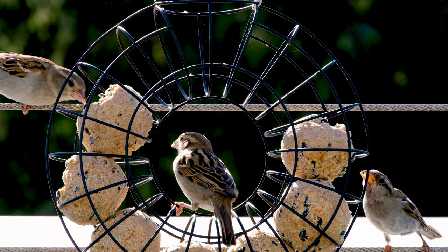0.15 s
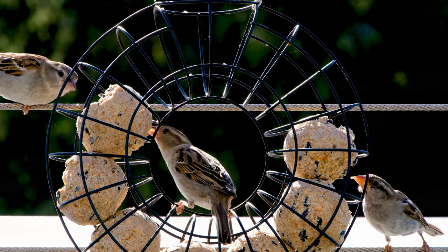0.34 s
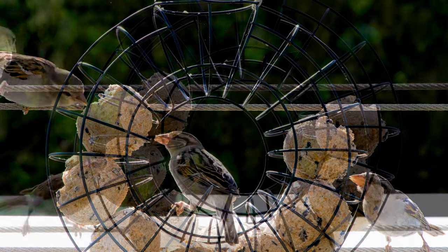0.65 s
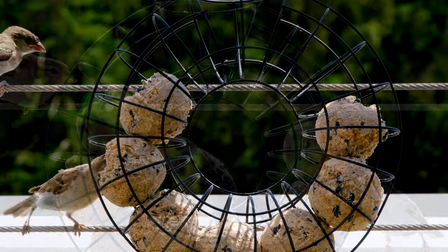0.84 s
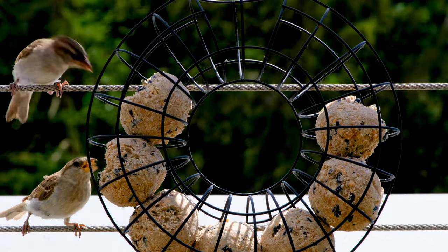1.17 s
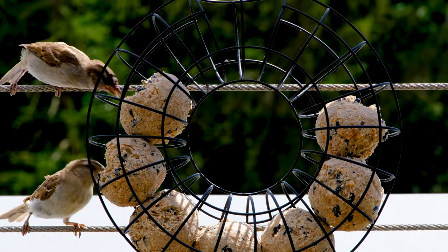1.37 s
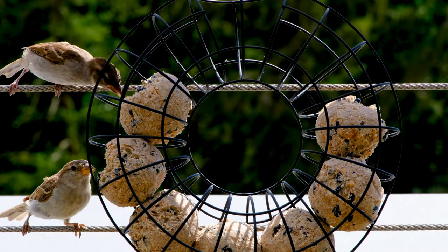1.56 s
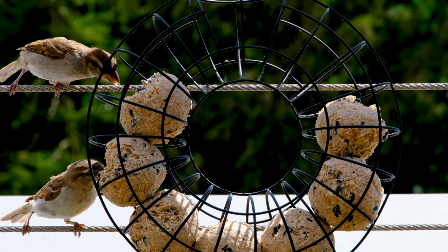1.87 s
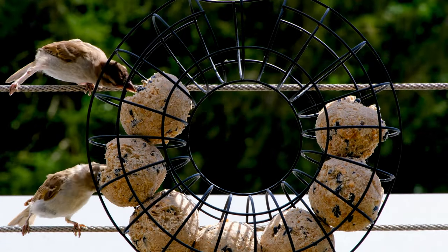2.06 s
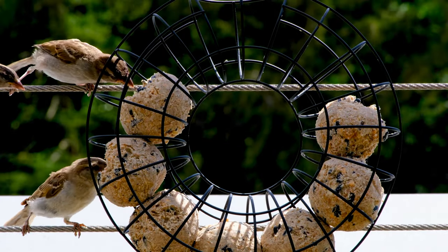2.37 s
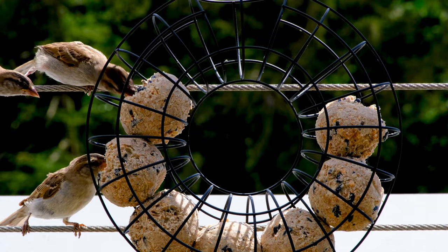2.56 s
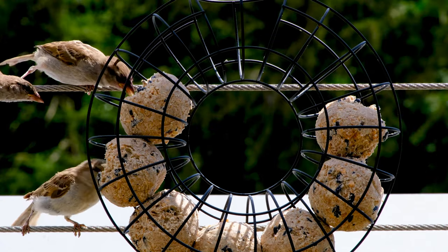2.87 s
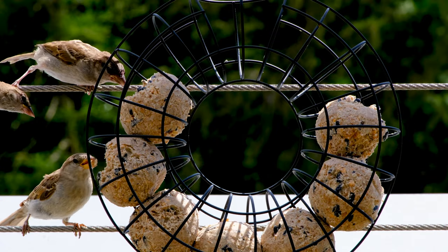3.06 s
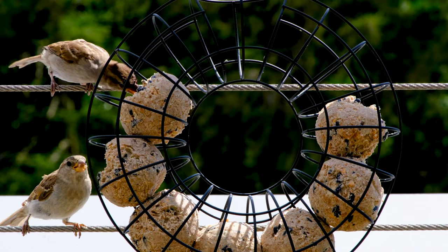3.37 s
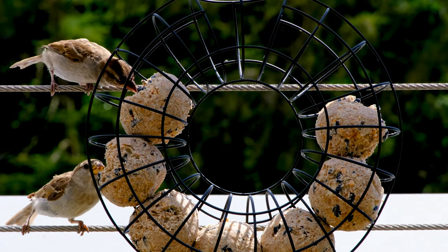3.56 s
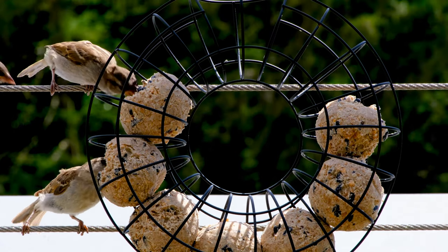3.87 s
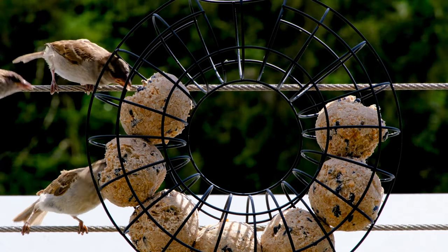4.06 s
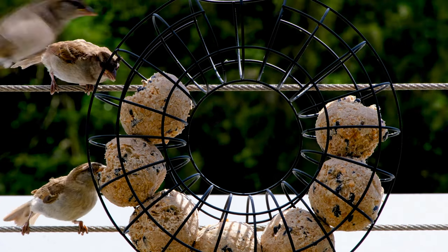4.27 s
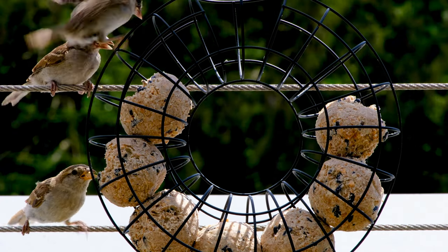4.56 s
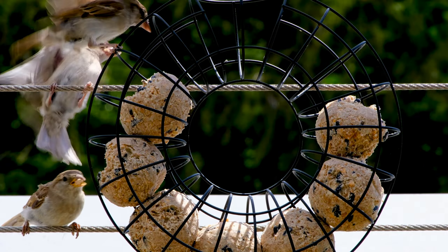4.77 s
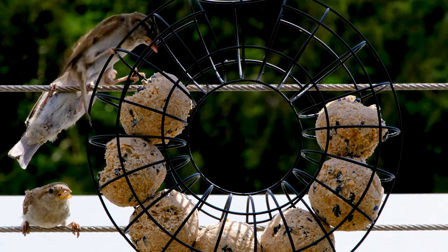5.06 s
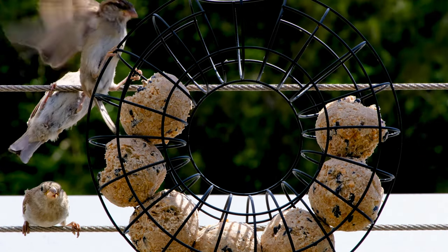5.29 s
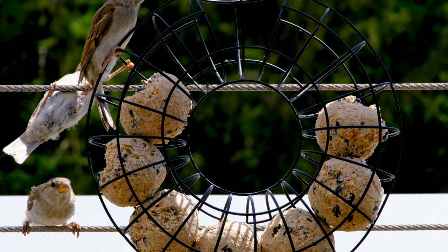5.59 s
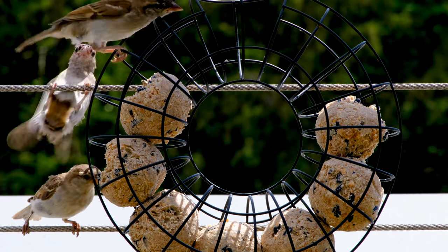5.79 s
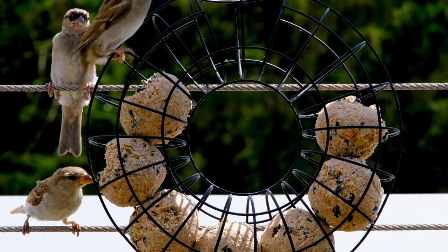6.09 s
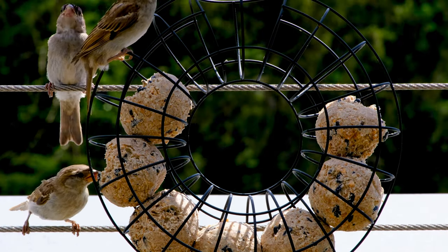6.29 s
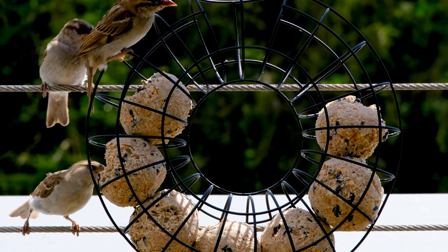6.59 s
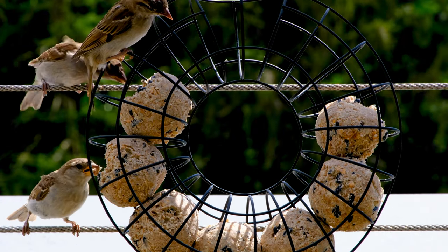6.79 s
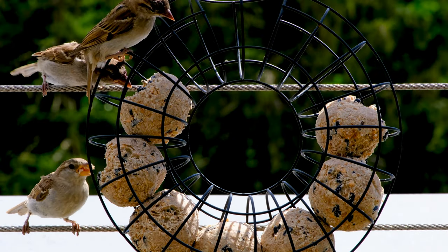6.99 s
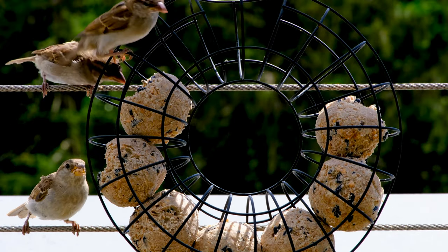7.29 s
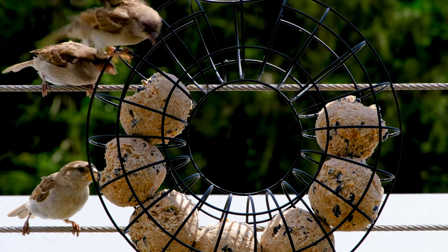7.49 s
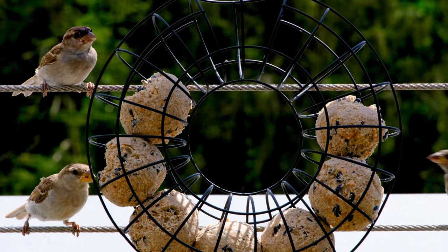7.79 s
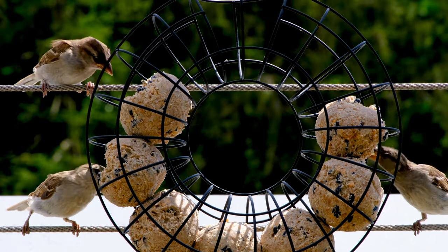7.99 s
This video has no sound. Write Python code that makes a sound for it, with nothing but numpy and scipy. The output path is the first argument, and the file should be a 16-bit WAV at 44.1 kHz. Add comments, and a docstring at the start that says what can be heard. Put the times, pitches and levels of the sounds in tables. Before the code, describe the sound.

Outdoors in a walled garden, a single microphone near a feeder picks up smooth low bird whistles, mostly in short pairs, each arching upward then dropping into a ringing tail. Bold chirps start it, quieter groups follow, then a lull, sparse calls and one loud late chirp. Behind lie soft leaf rustle, steady distant traffic, thin pulsing insects, tiny far peeps, faint coos and small muffled knocks; a cricket joins late.

```python
"""Sparrows at a feeder, heard slowed down: low whistled chirps rise and fall, ringing between garden walls.
Insects buzz in narrow pulsing bands, far birds coo and peep, beaks knock on the feeder, traffic rumbles below.
Bird voices are gliding sine tones, the sparrows' with overtones; echoes are fading noise tails.
Insects are narrow noise in pulses, knocks are filtered puffs, and the background is coloured noise."""
import sys
import numpy as np
from scipy import signal
from scipy.fft import rfft, irfft, next_fast_len
from scipy.io import wavfile
from scipy.ndimage import uniform_filter1d, map_coordinates

SR = 44100
rng = np.random.default_rng(int(sys.argv[2]) if len(sys.argv) > 2 else 0)


def elevation(decibels):
    """Turn decibel levels (scalar or array-like) into linear amplitude ratios."""
    levels = np.asarray(decibels, float)
    return 10 ** (levels / 20)


def unload_audio(sound):
    """Save the sound as a 16-bit wav file, at the path given as the first command line argument."""
    columns = np.transpose(np.atleast_2d(sound))
    # keep every value between -1 and 1, then stretch to whole-number steps
    steps = np.round(np.clip(columns, -1, 1) * 32767)
    wavfile.write(sys.argv[1], SR, steps.astype(np.int16))


N = 358974  # length in samples

# Background levels. Each row: time in seconds, leaves in dB, rustle in dB.
AIR_LEVELS = [(0.0, -60, -51.5), (0.29, -59.5, -63.5), (0.86, -60, -63), (1.09, -66.5, -73.5),
              (1.38, -63.5, -72), (1.65, -61, -67.5), (2.67, -61, -61), (3.26, -61.5, -67),
              (3.65, -62, -76), (4.06, -57.5, -74), (4.22, -55.5, -61), (4.53, -57.5, -62.5),
              (4.76, -63, -78), (5.17, -66, -80), (5.37, -82, -80.5), (5.64, -69, -76.5), (5.82, -61, -83),
              (6.39, -62.5, -76), (6.89, -58, -68), (7.16, -62, -85), (7.82, -62.5, -73), (8.14, -67, -91)]
# Colour of the traffic rumble. Each row: frequency in Hz, strength in dB.
RUMBLE_COLOUR = [(13, -34), (22, -4.5), (32, -10), (59, -2), (76, -2), (97, -7.5), (145, -8), (200, -11),
                 (247, -14.5), (280, -14.5), (324, -19.5), (420, -22), (550, -48), (920, -120)]
# Colour of the leaves. Each row: frequency in Hz, strength in dB.
LEAVES_COLOUR = [(180, -32.5), (300, -14), (432, -16.5), (490, -12.5), (664, -14.5), (911, -24),
                 (1500, -43.5), (1950, -68), (3300, -120)]
# Colour of the drier rustle. Each row: frequency in Hz, strength in dB.
RUSTLE_COLOUR = [(880, -31.5), (1500, -9.5), (1880, -13.5), (2160, -23.5), (2300, -24.5), (2990, -48),
                 (5060, -120)]
# Colour of the thin hiss. Each row: frequency in Hz, strength in dB.
HISS_COLOUR = [(1300, -120), (2200, -13), (3300, -6.5), (3800, -7.5), (5000, 1), (6800, -6), (8500, -5),
               (9600, -18), (11000, -18.5), (13000, -28), (15700, -37)]
# Insect chorus. Each row: time in seconds, level in dB.
BUZZ_LEVELS = [(0.0, -81), (0.34, -67.5), (0.48, -66.5), (0.79, -69.5), (1.61, -65.5), (2.12, -67.5),
               (3.52, -66), (3.93, -67), (4.22, -64), (4.73, -69), (5.14, -70), (5.22, -61.5), (5.39, -75),
               (5.8, -89)]
# Other insect bands. Each row: time in seconds, shrill band in dB, whine band in dB, low rasp in dB.
HEDGE_LEVELS = [(0.0, -76, -84, -74), (0.43, -72.5, -92, -74.5), (1.33, -83.5, -82.5, -86.5),
                (1.7, -93.5, -80.5, -78.5), (2.18, -95, -80, -76), (2.47, -86, -88, -65),
                (2.72, -75.5, -83, -67), (3.06, -86.5, -89, -71), (3.78, -93.5, -79.5, -78.5),
                (4.35, -80, -89.5, -71.5), (5.1, -95, -84, -81.5), (5.4, -94, -94, -90.5),
                (5.67, -88, -102, -92), (5.87, -74.5, -89.5, -81), (6.28, -84, -97, -109),
                (6.6, -82.5, -83, -87), (6.96, -78, -85, -78), (7.3, -82, -86.5, -87.5),
                (7.75, -79, -83.5, -83), (8.14, -93, -86, -78.5)]
# Bands of the low rasp. Each row: centre in Hz, width in Hz, level against the rasp in dB.
RASP_BANDS = [(2465, 230, -3), (2824, 220, -7.5), (3130, 150, -14.5), (3527, 310, -22)]
# A near cricket. One row: start in seconds, swell time in seconds, level in dB.
CRICKET_SONG = (6.87, .2, -58.5)
# Brief rests of the cricket between runs of strokes. Each entry: middle of the rest in seconds.
CRICKET_RESTS = [7.008, 7.16, 7.3, 7.411, 7.481, 7.537, 7.625, 7.745]
# Bursts of a katydid. Each row: start in seconds, length in seconds, level at the start in dB.
KATYDID_BURSTS = [(6.3, 0.3, -80), (6.74, 0.13, -70.5), (7.015, 0.22, -71), (7.424, .23, -75.5),
                  (7.72, .28, -84.5)]
# Whistled arches of the sparrows. Each row: time of the top in seconds, rise in seconds, fall in seconds,
# start pitch in Hz, top pitch in Hz, end pitch in Hz, level at the top in dB.
CHIRP_ARCHES = [(.054, 0.056, 0.065, 1174, 1473, 867, -23), (0.276, 0.016, 0.039, 1198, 1373, 1248, -25.5),
                (0.361, .048, 0.1, 1224, 1481, 762.6, -28), (.574, .056, 0.032, 892, 966, 902, -43.5),
                (0.638, .03, 0.062, 930, 1220, 850, -20), (1.289, 0.013, 0.084, 954, 1144, 855, -39),
                (1.472, .05, .05, 1076, 1225, 1018, -30), (1.55, .03, .065, 1098, 1286, 945, -30),
                (1.74, .03, 0.044, 1197, 1220, 1052, -35.5), (1.812, .022, .063, 1092, 1255, 867, -33.5),
                (2.12, 0.0049, 0.039, 720, 712, 677, -62.5), (2.242, 0.062, 0.068, 1045, 1356, 988, -37.5),
                (2.31, 0.009, 0.039, 890, 810, 700, -62), (2.467, 0.01, 0.051, 1265, 1282, 1114, -31.5),
                (2.556, 0.05, .09, 1144, 1432, 728, -28.5), (2.975, 0.06, .048, 697, 913, 878, -61),
                (3.05, 0.024, .075, 860, 1200, 786, -40.5), (3.24, .044, 0.047, 1107, 1227, 1078, -30),
                (3.31, 0.028, .055, 1140, 1288, 940, -32.5), (3.941, 0.038, 0.031, 873, 907, 900, -66),
                (4.009, .027, .054, 926, 1177, 855, -44.5), (4.102, .04, .052, 1068, 1355, 986, -34),
                (4.229, .06, 0.074, 1184, 1342, 929, -38), (4.405, .035, 0.085, 1299, 1444, 797, -34.5),
                (5.628, .04, 0.077, 1023, 1374, 998, -43.5), (5.864, .01, 0.037, 1300, 1258, 1253, -35.5),
                (5.937, .04, 0.059, 1208, 1411, 1000, -32.5), (6.62, 0.033, 0.012, 808, 820, 890, -62.5),
                (6.67, 0.03, 0.074, 888, 1214, 828, -38.5), (6.851, .034, 0.046, 1006, 1197, 1039, -28.5),
                (6.924, 0.017, .06, 1014, 1240, 832, -26.5), (7.4, .025, 0.13, 662, 903, 876, -55.5),
                (7.475, .028, .065, 932, 1069, 807, -41), (7.648, 0.052, .037, 1031, 1244, 1054, -33.5),
                (7.718, 0.024, 0.065, 1091, 1285, 846, -18.5)]
# How the birds face the microphone. Each row: time in seconds, echo in dB, overtones in dB,
# extra for overtones above 12.5 kHz in dB, fade away from the top pitch in dB per octave.
BIRD_FACING = [(0.049, -10.5, -28.5, -3.5, 17), (0.28, -9, -36, -8, 3), (0.36, -7.5, -27, -3.5, 11),
               (0.632, -17.5, -40.5, 2.5, 56), (1.298, -6, -32.5, -20.5, 33), (1.47, -5, -37.5, 1, 33.5),
               (1.55, -9.5, -36.5, 8.5, 21.5), (1.781, -5, -36.5, 5, 24), (2.229, 2, -36.5, -7, 36),
               (2.47, -7, -31.5, -8.5, 79), (2.549, -7.5, -29, 3, 20.5), (3.06, 5, -39.5, 2.5, 13),
               (3.28, -7.5, -38.5, 5, -0.5), (4.011, -0.5, -35.5, -4.5, -12.5), (4.11, 2, -36.5, 5.5, 16),
               (4.23, 6.5, -39, 9.5, 12.5), (4.41, -2, -28.5, -4.5, 9), (5.63, 7.5, -33.5, 2, 47),
               (5.86, -11.5, -42, 5.5, 31), (5.941, -0.5, -25, 1, 28), (6.68, -0.5, -40, -8.5, -5),
               (6.849, -6.5, -44.5, 3, 10), (6.92, -10, -42, -4.5, 37), (7.481, -5.5, -39, -11.5, 3),
               (7.65, -2.5, -38, 4.5, -2), (7.72, -14.5, -42, 5, 71.5)]
# Overtones of the whistle. Each row: multiple of the pitch, strength in dB.
OVERTONE_LEVELS = [(2, -1), (3, -25.5), (4, -4.5), (5, -1.5), (6, -24), (7, -13), (8, -19.5), (9, -8),
                   (10, -25), (11, -15.5), (12, -18.5), (13, -27)]
# Throat resonances that pass the overtones. Each row: centre in Hz, width in Hz, strength in dB.
THROAT_RESONANCES = [(2500, 500, 0.5), (5556, 1030, 3), (6530, 2000, -5.5), (10050, 3400, 3),
                     (13700, 1300, -2), (15500, 700, 0.5)]
# Level of the whistle by pitch: weakest at 700 Hz, strongest near 850 Hz.
# Each row: pitch in Hz, level in dB.
WHISTLE_LEVELS = [(700, -12.5), (850, -1), (1000, -4.5), (1500, -2.5)]
# Echo decay, before the extra late loss. Each row: frequency in Hz, time to fall 60 dB in seconds.
GARDEN_DECAY = [(800, 0.18), (1050, 0.47), (1250, 0.6), (1450, 0.86), (5000, 0.56), (12000, .38)]
# Strength of the garden's echo. Each row: frequency in Hz, strength in dB.
WALL_STRENGTH = [(800, -0.5), (1000, -6), (1200, 6), (1400, 3), (2600, -0.5), (5000, 5), (7000, 6),
                 (12000, 6.5)]
# Far cooing. Each row: start in seconds, length in seconds, first pitch in Hz, last pitch in Hz,
# level at mid-note in dB.
COO_NOTES = [(.03, 0.16, 499, 526, -52), (.25, 0.22, 500, 487, -61), (2.64, 0.12, 500, 500, -60.5),
             (3.519, .1, 608, 557, -58), (3.721, 0.13, 652, 693, -59), (3.974, 0.21, 618, 616, -48),
             (4.231, 0.11, 624, 604, -57.5), (3.702, 0.31, 335, 301, -55.5), (3.975, 0.2, 319, 300, -59.5),
             (6.268, 0.115, 568, 615, -59.5), (6.422, 0.058, 610, 564, -52),
             (6.495, 0.058, 582, 698, -56.5), (6.251, 0.12, 740, 800, -66.5),
             (6.369, 0.056, 758, 750, -57.5)]
# Beak knocks and scrapes. Each row: time in seconds, peak in dB, centre in Hz, width in Hz,
# time for the puff to fall 60 dB in seconds.
BEAK_KNOCKS = [(.022, -25.5, 1000, 1800, 0.023), (.855, -42, 1170, 2000, 0.037),
               (1.7, -62, 1600, 598, 0.03), (2.779, -47, 1800, 1490, .05), (4.462, -61, 1855, 500, 0.03),
               (4.717, -49, 1490, 396, 0.03), (6.69, -51.5, 1810, 700, 0.2), (6.742, -51, 1710, 700, 0.15),
               (6.775, -58, 1850, 700, .06), (6.948, -54, 1920, 602, 0.1)]
# Far sparrows. Each row: start in seconds, level before distance in dB, pitch in Hz, length in seconds.
FAR_PEEPS = [(.07, -55, 1630, 0.057), (2.04, -55, 1790, 0.059), (2.32, -52, 2530, 0.034),
             (2.335, -51, 2340, 0.039), (2.33, -58, 1790, 0.035), (2.46, -50, 2587, 0.06),
             (2.47, -67, 1810, .039), (2.63, -51, 2626, 0.058), (2.75, -53, 2630, 0.066),
             (2.92, -51.5, 2530, 0.053), (4.0, -63.5, 1790, 0.13), (4.16, -57.5, 2500, .036),
             (4.64, -64, 2860, 0.031), (5.125, -61, 2810, 0.02), (6.76, -51.5, 1832, 0.025),
             (6.8, -66, 2390, 0.07), (6.93, -64.5, 2370, .03), (6.94, -65, 1840, 0.079),
             (7.7, -69, 2535, 0.03), (7.985, -65, 2560, 0.089)]
# A far warbler, turn by turn. Each row: time in seconds, pitch in Hz, level before distance in dB.
WARBLER_TURNS = [(6.999, 2650, -71), (7.089, 2648, -57), (7.2, 2676, -64), (7.251, 2900, -63.5),
                 (7.289, 2610, -81), (7.329, 2580, -63), (7.373, 3080, -71.5), (7.415, 2700, -60.5),
                 (7.469, 2576, -74.5), (7.521, 3030, -68.5), (7.6, 3090, -78.5), (7.69, 3050, -78)]


def unit(x):
    """Scale to an rms (average strength) of 1."""
    return x / np.sqrt(np.mean(x ** 2) + 1e-20)


def along(points, hz):
    """Read a curve of (Hz, value) points, spaced along a log frequency axis."""
    f, value = np.transpose(points)
    return np.interp(np.log(hz + 1), np.log(f + 1), value)


def curves(rows):
    """One value per sample for each column after the time."""
    s, *columns = np.transpose(rows)
    return [np.interp(np.arange(N) / SR, s, column) for column in columns]


def wobble(rate):
    """A smooth random curve through `rate` random points a second."""
    points = rng.standard_normal(int(N * 200 / SR) + 4)
    return map_coordinates(points, [np.arange(N) * rate / SR])


def rush(spectrum, patchy_db):
    """Coloured noise of rms 1, made uneven by patches of random gain in time and pitch."""
    _, _, z = signal.stft(rng.standard_normal(N + 2048), SR, nperseg=1024)
    patches = uniform_filter1d(rng.standard_normal(z.shape), size=8, axis=0)
    patches = uniform_filter1d(patches, size=8, axis=1)
    noise = signal.istft(z * elevation(patchy_db * unit(patches)), SR, nperseg=1024)[1][:N]
    colour = elevation(along(spectrum, np.fft.rfftfreq(N, 1 / SR)))
    return unit(irfft(rfft(noise) * colour, N))


def air():
    """Traffic rumble, leaves, a drier rustle and a thin hiss, each a coloured noise of changing level."""
    leaves_db, rustle_db = curves(AIR_LEVELS)
    rumble = elevation(-48.5 + 1.6 * wobble(2.8)) * rush(RUMBLE_COLOUR, patchy_db=0.66)
    leaves = elevation(leaves_db) * rush(LEAVES_COLOUR, patchy_db=1.05)
    rustle = elevation(rustle_db) * rush(RUSTLE_COLOUR, patchy_db=4.0)
    hiss = elevation(-78.5 + 1.5 * wobble(4)) * rush(HISS_COLOUR, patchy_db=4.0)
    return rumble + leaves + rustle + hiss


def insect(hz, width_hz, pulse_hz, depth, steady=0, drift=0.0011):
    """Narrow noise (plus a steady tone) around a centre pitch, swelling with every wing stroke."""
    m = next_fast_len(N)
    f = np.fft.rfftfreq(m, 1 / SR)
    slow = irfft(rfft(rng.standard_normal((2, m))) / (1 + (2 * f / width_hz) ** 4), m)
    i, q = unit(slow[:, :N])
    # two slow noises on a cosine and a sine make a band around the centre
    turn = 2 * np.pi * np.cumsum(hz * np.ones(N)) / SR
    band = (i + steady) * np.cos(turn) + q * np.sin(turn)
    stroke = np.cos(2 * np.pi * np.cumsum(pulse_hz * (1 + drift * wobble(10))) / SR)
    return unit(band * np.exp(depth * stroke))


def cricket():
    """A wavering wing tone that swells in, pauses briefly and slowly fades."""
    t = np.arange(N) / SR
    begins, swell, level_db = CRICKET_SONG
    wing_hz = 6245 + 18 * wobble(9.1)
    level = np.clip((t - begins) / swell, 0, 1) ** 2 * elevation(level_db + 0.82 * wobble(54))
    rest_s, rest_db, tire_db_per_s = .011, -11, 3  # half-length and depth of a rest; slow fading
    rest = sum(np.exp(-((t - s) / rest_s) ** 4) for s in CRICKET_RESTS)
    level = level * elevation(rest_db * rest - tire_db_per_s * np.clip(t - begins, 0, None))
    return level * insect(wing_hz, width_hz=76, pulse_hz=76.4, depth=1.2, steady=2.4, drift=0.012)


def katydid():
    """High pulsing noise in bursts that have soft edges and sag slightly."""
    t = np.arange(N) / SR
    edge_s, sag_db = .03, 0.5
    bursts = np.zeros(N)
    for s, length, db in KATYDID_BURSTS:
        edge = np.clip(np.minimum(t - s, s + length - t) / edge_s, 0, 1)
        bursts += edge * elevation(db - sag_db * np.clip((t - s) / length, 0, 1))
    return bursts * elevation(1.5 * wobble(22)) * insect(9020, width_hz=280, pulse_hz=93.3, depth=0.48)


def insects():
    """Bands of pulsing noise buzz in the hedge, joined by a cricket and a katydid with clear strokes."""
    buzz_db, = curves(BUZZ_LEVELS)
    shrill_db, whine_db, rasp_db = curves(HEDGE_LEVELS)
    buzz_hz = 5856 + 40 * wobble(3)
    buzz = insect(buzz_hz, width_hz=450, pulse_hz=76.5, depth=.38, drift=.02)
    buzz = elevation(buzz_db + 1.5 * wobble(6)) * buzz
    shrill = elevation(shrill_db) * insect(9050, width_hz=610, pulse_hz=95, depth=.3)
    whine = elevation(whine_db) * insect(4520, width_hz=300, pulse_hz=22.5, depth=.3)
    rasp = np.zeros(N)
    for hz, width_hz, db in RASP_BANDS:
        rasp += elevation(db + 4.2 * wobble(11)) * insect(hz, width_hz, pulse_hz=58.7, depth=0.33)
    return buzz + shrill + whine + elevation(rasp_db) * rasp + cricket() + katydid()


def smooth(curve, size):
    """Round off corners by averaging over `size` samples, twice."""
    once = uniform_filter1d(curve, size, mode="nearest")
    return uniform_filter1d(once, size, mode="nearest")


def note(rows, fade):
    """Start sample, smooth pitch and faded gain of one note, from its (s, Hz, dB) points."""
    s, hz, db = np.transpose(rows)
    t = np.arange(s[0] - fade / 2, s[-1] + fade / 2, 1 / SR)
    t = t[t >= 0]
    edge = np.clip(np.minimum(t - s[0] + fade / 2, s[-1] + fade / 2 - t) / fade, 0, 1)
    level = np.sqrt(2) * elevation(np.interp(t, s, db))  # a sine's peak is the root of 2 times its rms
    gain = smooth(level, size=150) * np.sin(edge * np.pi / 2) ** 2
    return round(t[0] * SR), smooth(np.interp(t, s, hz), size=260), gain


def garden(x):
    """A fresh echo of noise: each frequency dies at its own speed, after a short gap."""
    hz, t, z = signal.stft(rng.standard_normal(SR), SR, nperseg=256)
    late_db = 60 * (t / 0.88) ** 3  # the echo's late part falls away faster and faster
    z = z * elevation(-60 * t / along(GARDEN_DECAY, hz)[:, None] - late_db)
    z = z / np.linalg.norm(z, axis=1, keepdims=True)  # the same energy at every pitch
    scale = np.linalg.norm(signal.istft(z, SR, nperseg=256)[1])
    tail = signal.istft(z * elevation(along(WALL_STRENGTH, hz))[:, None], SR, nperseg=256)[1]
    gap = round(0.015 * SR)
    return signal.fftconvolve(np.pad(x, (gap, 0)), tail / scale)


def arch(top_s, rise_s, fall_s, start_hz, top_hz, end_hz, db, fade_db):
    """(s, Hz, dB) points of a glide to a rounded top and down, its level changing with the pitch."""
    u = np.linspace(-1, 1, num=17)  # -1 at the start, 0 at the top, 1 at the end
    up = u < 0
    rounding = np.where(up, .5, .22)  # share of each flank that the top is rounded over
    bend = (np.hypot(u, rounding) - rounding) / (np.hypot(1, rounding) - rounding)
    hz = top_hz + (np.where(up, start_hz, end_hz) - top_hz) * bend
    octaves = np.log2(top_hz / hz)
    # the rising flank swells by 8 dB per octave plus a share of the fade
    loss_db = np.where(up, 8 + .45 * fade_db, fade_db) * np.abs(octaves)
    loss_db = loss_db + along(WHISTLE_LEVELS, top_hz) - along(WHISTLE_LEVELS, hz)
    spent_oct, spent_db_per_oct = .35, 34.5  # breath runs out once the pitch has sunk this far
    loss_db = loss_db + spent_db_per_oct * ~up * np.clip(octaves - spent_oct, 0, None)
    s = top_s + u * np.abs(np.where(up, rise_s, fall_s))
    return np.transpose([s, hz, db - loss_db])


def sparrows():
    """A whistle gliding in pitch, with faint overtones through the throat, answered by the walls."""
    out = np.zeros(N + 2 * SR)
    flutter = elevation(2.5 * wobble(70))  # random waver in the whistle's strength
    scatter = .18 * wobble(190)  # phase scatter in radians, which roughens the overtones
    when, *facing = np.transpose(BIRD_FACING)
    order, order_db = np.transpose(OVERTONE_LEVELS)[:, :, None]
    for row in CHIRP_ARCHES:
        echo_db, bright_db, top_db, fade_db = (np.interp(row[0], when, column) for column in facing)
        start, hz, gain = note(arch(*row, fade_db), fade=.009)
        gain = gain * flutter[start:][:len(hz)]
        turn = 2 * np.pi * np.cumsum(hz) / SR
        throat = sum(elevation(db) / (1 + (2 * (order * hz - centre) / width) ** 4)
                     for centre, width, db in THROAT_RESONANCES)
        throat = throat * elevation(order_db + top_db * (order * hz > 12500))
        phase = order * (turn + scatter[start:][:len(hz)]) + rng.uniform(0, 2 * np.pi, order.shape)
        held = 1 / (1 + (np.gradient(hz) * SR / 4500) ** 2)  # overtones thin out in fast glides
        overtones = held * np.sum(throat * np.sin(phase), axis=0)
        whistle = gain * np.sin(turn)
        edge = gain * elevation(bright_db) * overtones
        echo = elevation(echo_db) * garden(whistle + edge)
        out[start:][:len(hz)] += whistle + 0.55 * edge  # the beak points its treble away, at the walls
        out[start:][:len(echo)] += echo
    return out[:N]


def far_bird():
    """Soft low sine tones, wavering in strength and pitch through the distance, with an echo."""
    out = np.zeros(N + SR)
    waver = elevation(3.9 * wobble(30))
    drift = 1 + 0.014 * wobble(30)
    u = np.linspace(0, 1, num=7)
    for s, length, first_hz, last_hz, db in COO_NOTES:
        pitch = first_hz + u * (last_hz - first_hz)
        level_db = db - 3.5 * (2 * u - 1) ** 2  # softer at both ends
        start, hz, gain = note(np.transpose([s + u * length, pitch, level_db]), fade=0.019)
        span = slice(start, start + len(hz))
        out[span] += gain * waver[span] * np.sin(2 * np.pi * np.cumsum(hz * drift[span]) / SR)
    return out[:N] + elevation(-6) * garden(out)[:N]


def beaks():
    """Each knock is a dull puff of noise, shaped by the part of the feeder that is struck."""
    out, t = np.zeros(N + SR), np.arange(4096) / SR
    f = np.fft.rfftfreq(len(t), 1 / SR)
    for s, db, hz, width_hz, t60 in BEAK_KNOCKS:
        puff = rng.standard_normal(len(t)) * elevation(-60 * t / t60) * (1 - np.exp(-t / 0.0092))
        body = (1j * f * width_hz / (hz * hz - f * f + 1j * f * width_hz)) ** 2
        body = body / (1 + 1j * f / 3300) ** 6  # the soft beak contact is dull
        knock = irfft(rfft(puff) * body, len(t))
        out[round(s * SR):][:len(t)] += elevation(db) * knock / np.abs(knock).max()
    return out[:N]


def chatter():
    """Rows of fainter peeps at chance moments, louder when the insects' low rasp is louder."""
    pitches_hz, per_s, over_rasp_db = np.array([1890, 2500, 2620, 3380]), 14, 9.5
    draw = rng.random((round(per_s * N / SR), 4))
    s = draw[:, 0] * (N / SR - .3)
    hz = pitches_hz[(draw[:, 1] * len(pitches_hz)).astype(int)]
    rasp_db = curves(HEDGE_LEVELS)[2][(s * SR).astype(int)]
    db = rasp_db + over_rasp_db - 8 * draw[:, 2]
    return np.transpose([s, db, hz, 0.014 + 0.013 * draw[:, 3]])


def far_sparrows():
    """Short hoarse peeps and a wandering warble, sine tones that arrive largely as echo."""
    out = np.zeros(N + 2 * SR)
    hoarse = 1 + 0.014 * wobble(90)  # shaky pitch
    calls = [WARBLER_TURNS]
    for s, db, hz, length in [*FAR_PEEPS, *chatter()]:
        calls.append([(s, 1.015 * hz, db - 5.0), (s + length / 3, hz, db), (s + length, .98 * hz, db - 9.5)])
    for rows in calls:
        start, hz, gain = note(rows, fade=0.0054)
        voice = gain * np.sin(2 * np.pi * np.cumsum(hz * hoarse[start:][:len(hz)]) / SR)
        echo = garden(voice)
        after_s = np.clip(np.arange(len(echo)) - len(voice), 0, None) / SR
        echo = echo * elevation(-80 * after_s)  # open ground: a shorter tail
        out[start:][:len(hz)] += 0.53 * voice
        out[start:][:len(echo)] += 0.43 * echo
    return out[:N]


def scene():
    """All sources added up at one microphone."""
    mix = air() + insects() + sparrows() + far_bird() + beaks() + far_sparrows()
    return mix[None]  # one channel


def low_pass(x):
    """Removes everything above the highest recorded frequency."""
    return signal.sosfilt(signal.butter(12, 15710, fs=SR, output="sos"), x)


def record(dry):
    """The converter adds a small constant offset to the sound."""
    return low_pass(dry + .0258)


dry = scene()
out = record(dry)
unload_audio(out)
```